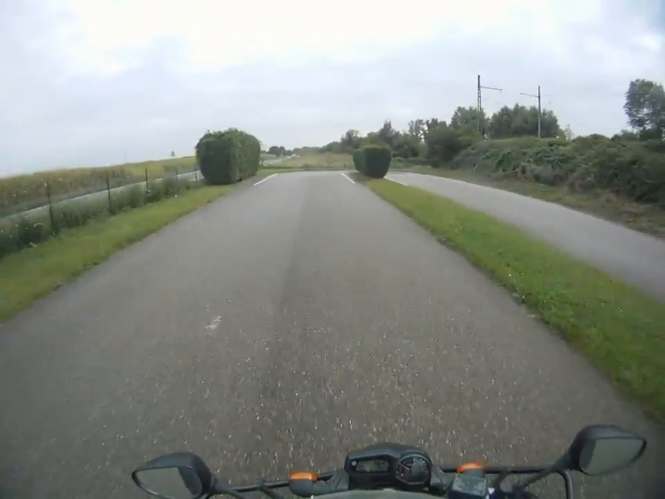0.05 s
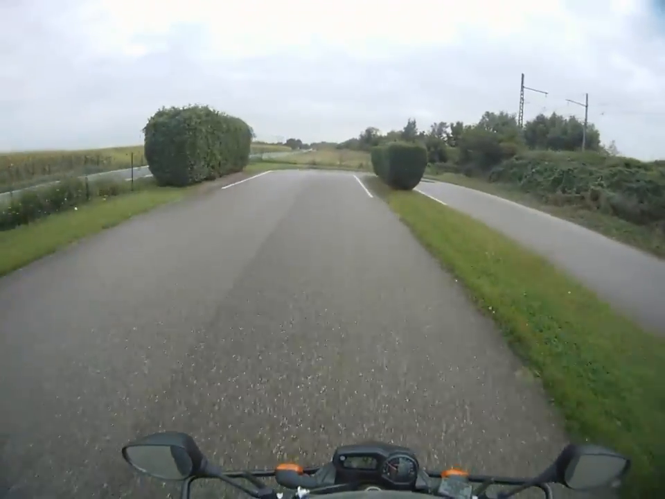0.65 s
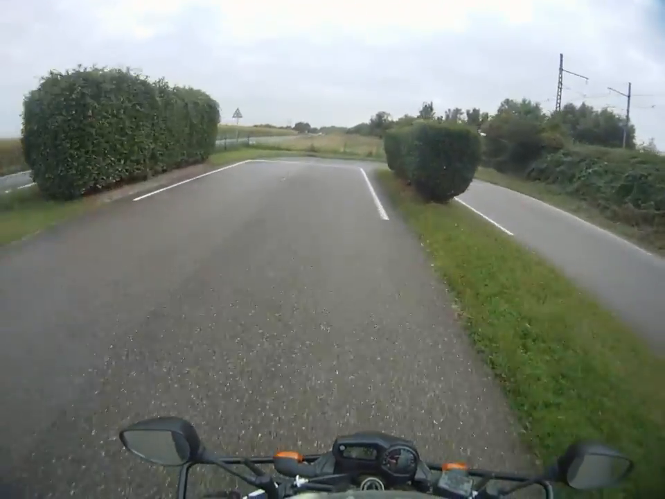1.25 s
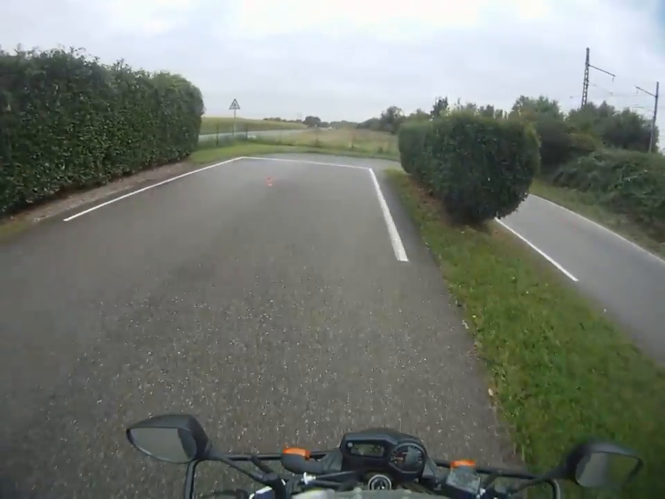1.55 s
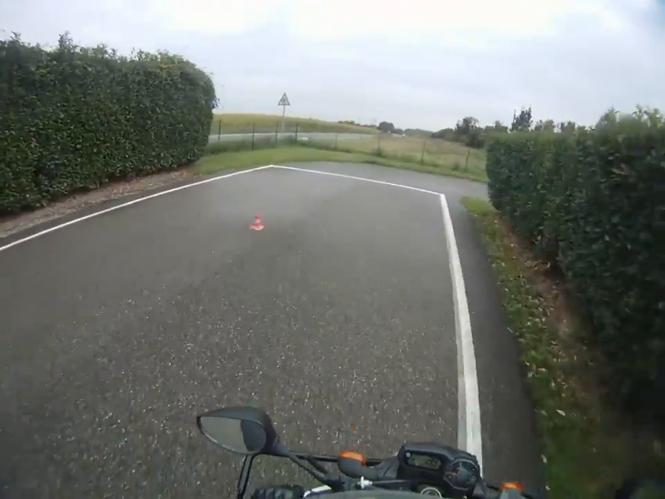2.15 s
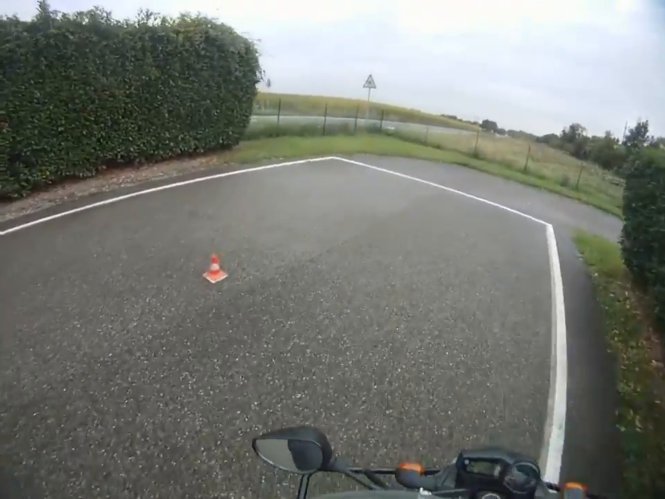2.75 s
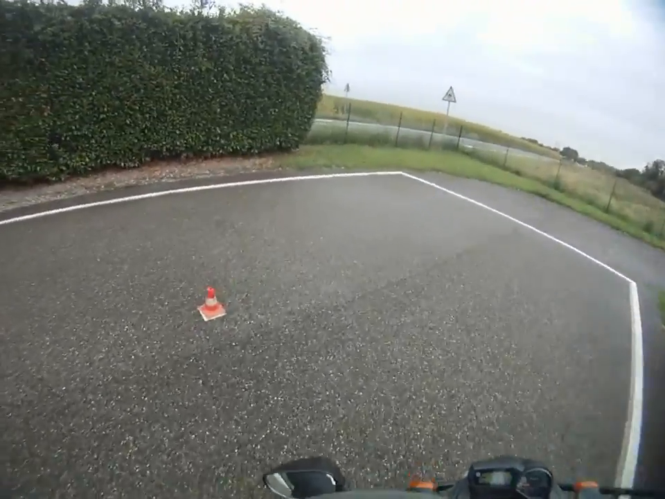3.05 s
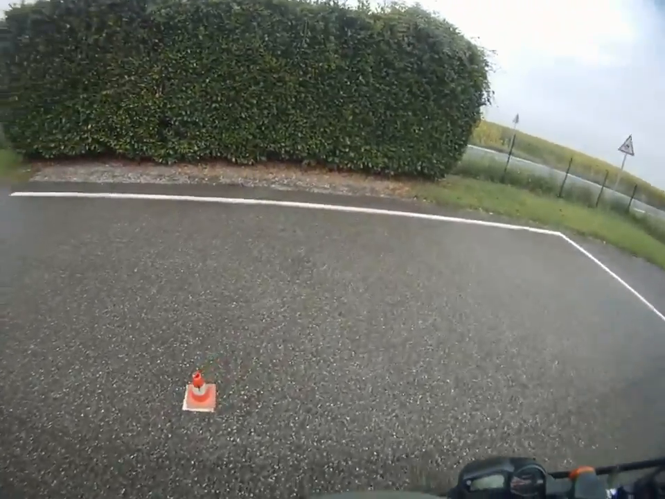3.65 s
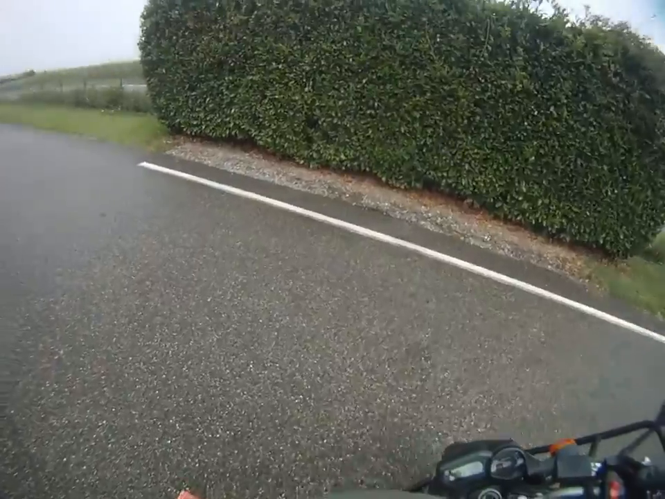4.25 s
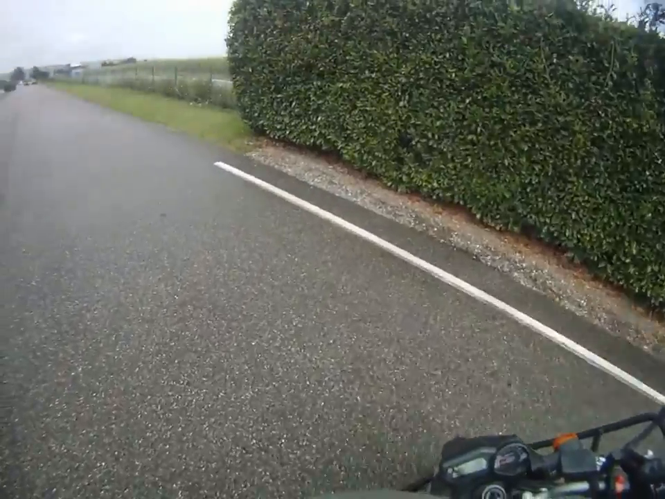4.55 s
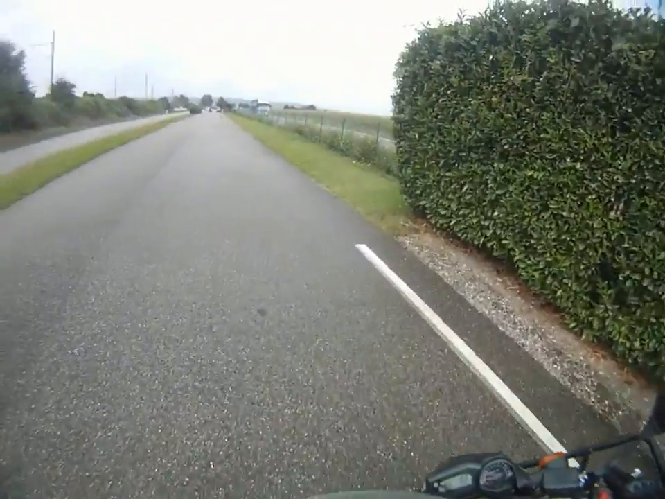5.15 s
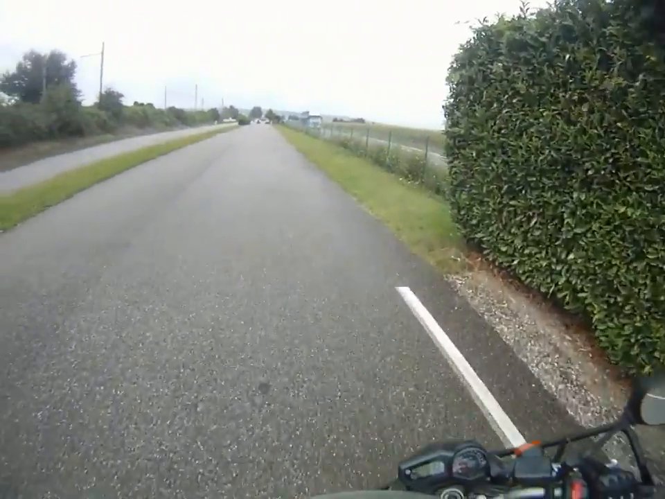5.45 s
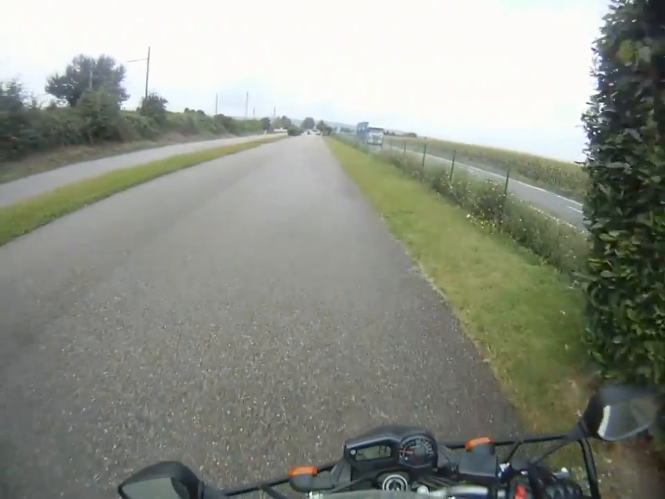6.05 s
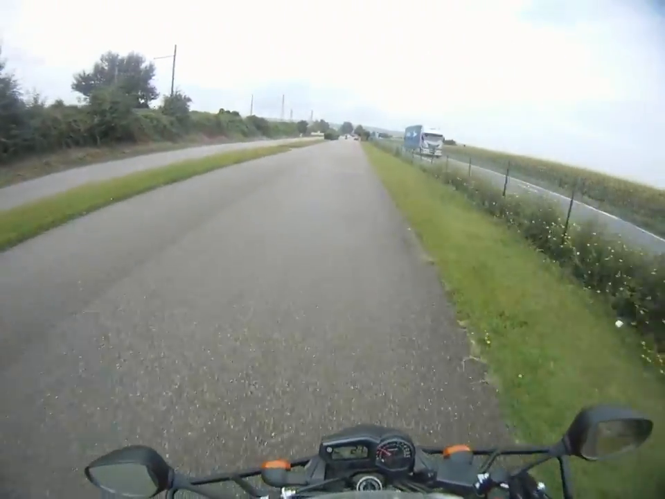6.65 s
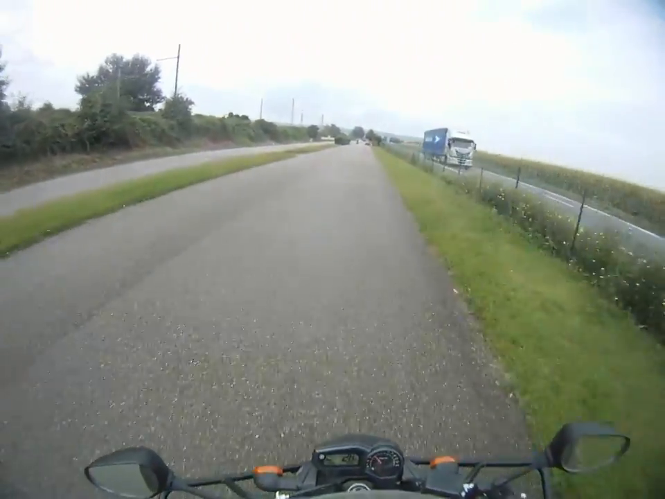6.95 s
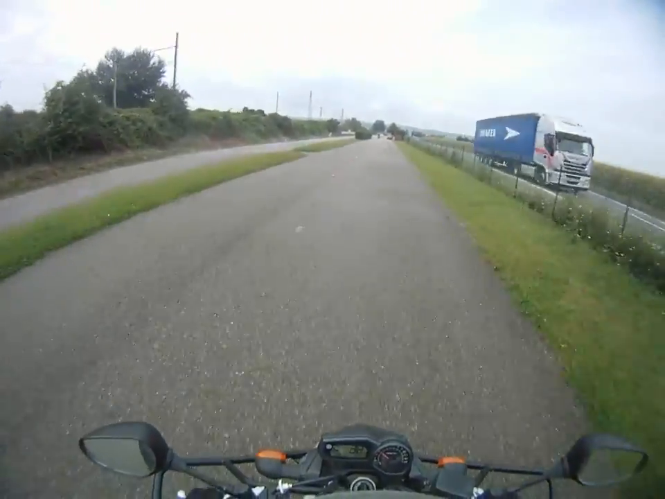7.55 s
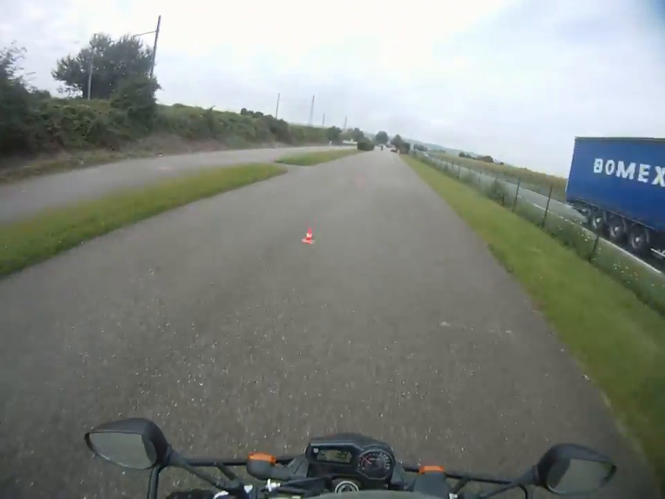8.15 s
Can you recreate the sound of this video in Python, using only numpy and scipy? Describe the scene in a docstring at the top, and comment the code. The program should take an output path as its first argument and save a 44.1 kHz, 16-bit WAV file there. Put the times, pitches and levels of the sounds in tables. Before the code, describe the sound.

A motorcycle is heard from the rider's helmet, with wind hissing and booming. The engine runs down with the throttle shut, two sharp clacks sound, and the wind calms. At low speed the helmet gives short, dull judders. After a throttle blip the engine pulls away with a rising growl and a whining chain, clacks through one upshift, and pulls again as the wind builds.

```python
"""A motorcycle, heard from the rider's helmet, rolls off, turns slowly, pulls away and shifts up once.
The exhaust hums, the intake growls and each engine order swells as it sweeps through a resonance.
Valves clatter, gears whine, chain and tyres whirr, and the chain's song climbs with the wheel.
Wind hisses over the shell and booms in its low modes; controls clack; the helmet judders in the turn."""
import sys
import numpy as np
from scipy import signal
from scipy.fft import rfft, irfft
from scipy.io import wavfile
from scipy.ndimage import uniform_filter1d

SR = 44100
rng = np.random.default_rng(int(sys.argv[2]) if len(sys.argv) > 2 else 0)


def wav_out(sig):
    """Save sig, one row per channel (or a flat mono array), as 16-bit PCM at SR to the path in sys.argv[1]."""
    wavfile.write(sys.argv[1], SR, np.round(np.clip(np.atleast_2d(sig).T, -1, 1) * 32767).astype(np.int16))


N = 366912
TIME = np.arange(N) / SR
FREQ = np.maximum(np.arange(N // 2 + 1) * SR / N, 1)

# the engine runs down, throttle shut: (time [s], four-stroke cycle rate [Hz])
REVS_DOWN = [(0, 57.5), (1.4, 32), (2.6, 19.5)]
# the engine pulls away, with one upshift: (time [s], four-stroke cycle rate [Hz])
REVS_UP = [(4.1, 19.6), (4.35, 21.9), (4.68, 20.3), (4.8, 20.64), (5.4, 24.8), (5.67, 28.15), (6, 36.23),
           (6.28, 44.73), (6.6, 54.65), (6.95, 67.47), (7.05, 62.2), (7.2, 55.7), (7.33, 48.3), (7.4, 48.2),
           (7.65, 52.76), (7.88, 57.96), (8.04, 53.5), (8.32, 52)]
# a throttle blip in the turn, then one pull in each gear:
# (opens [s], shuts [s], roll-on [s], roll-off [s], exhaust hum at its resonance [dB])
THROTTLE_PULLS = [(4.05, 4.298, .081, .17, -48), (4.403, 6.94, .63, .07, -44.5),
                  (7.205, 7.875, .025, .15, -37.3)]
# engine orders meeting resonances: (order [x cycle rate], resonance [Hz], half width [Hz], level [dB])
ORDER_SWELLS = [(4, 152, 64, -45.8), (6, 152, 38, -52), (8, 170, 15, -61), (8, 502, 50, -47),
                (9, 499, 48, -50.5), (10, 510, 46, -47.7), (11, 495, 45, -52.3), (12, 490, 70, -53),
                (13, 510, 56, -61), (14, 505, 50, -60), (16, 520, 60, -65)]
# low resonances of the intake: (frequency [Hz], width [Hz], gain [dB])
INTAKE_MODES = [(505, 130, -12.5), (780, 380, -26)]
# airbox resonances: (frequency [Hz], width [Hz], gain [dB])
AIRBOX_MODES = [(1263, 95, -6.5), (1590, 180, -24), (1900, 240, -13)]
# ring of the engine casing: (frequency [Hz], width [Hz], gain [dB])
CASING_MODES = [(610, 55, -4), (1075, 45, 8), (1160, 100, 8), (1285, 70, 4), (1820, 150, 6),
                (3110, 160, -2), (3600, 150, -5)]
# whining gears: (teeth meshing [per cycle], trim [dB])
GEAR_MESHES = [(54, -11), (58, -12), (88, -8.5)]
# frame resonances that chain and gear tones sweep through: (frequency [Hz], level [dB])
FRAME_EQ = [(400, -75), (540, -66), (615, -55), (670, -58), (748, -50.5), (830, -62), (900, -68),
            (980, -63), (1080, -50), (1170, -44), (1270, -52), (1430, -56), (1530, -51), (1640, -58),
            (1820, -49.5), (2050, -51), (2500, -59), (3100, -62), (4500, -78)]
# second gear, first with the clutch slipping in the turn, second again: (time [s], links [per cycle])
CHAIN_LINKS = [(2.2, 9.3), (3, 6.66), (4.6, 5.2), (5.05, 5.4), (5.62, 6.66), (6.95, 6.66), (7.3, 9.8)]
# tone of chain, gears and tread whirring: (frequency [Hz], gain [dB])
WHIRR_EQ = [(200, -14), (370, -10.5), (490, -5.5), (750, -10.5), (970, -9), (1080, 6.5), (1190, 2.5),
            (1450, -8), (1680, -2.5), (1900, 3), (2250, -4.5), (2600, -26), (3700, -24), (4900, -19),
            (6600, -19), (9000, -30), (15000, -29.5)]
# the bike slows for the turn and pulls away: (time [s], airspeed [m/s])
AIRSPEED = [(0, 11.32), (.7, 11.4), (1.25, 9.22), (2, 5.54), (3.1, 4.55), (3.9, 4.25), (4.9, 4.23),
            (5.4, 4.05), (6.15, 7.3), (6.9, 8.54), (7.2, 7.7), (7.7, 10.2), (8.1, 11.5), (8.32, 10.9)]
# tone of hissing air: (frequency [Hz], gain [dB])
HISS_EQ = [(150, -21), (400, -14), (690, -15), (840, -6), (1350, -3), (1650, -5.5), (2230, 3), (2700, -8),
           (3050, -6.5), (4100, -16), (5200, -19.5), (7100, -21.5), (11000, -29), (15500, -31)]
# boom of the helmet shell: (frequency [Hz], width [Hz], gain [dB])
SHELL_MODES = [(74.5, 10.7, 3), (109, 27, 0.5), (126.5, 4, -6), (221, 24, -10.5), (260.7, 32, -6.5),
               (307.3, 8.8, -11)]
# the padding passes only the lows: (frequency [Hz], gain [dB])
PADDING_EQ = [(25, -34), (55, -0.5), (68, 4.5), (150, -4.5), (190, 1.5), (315, -6), (380, -15.5), (650, -3),
              (1000, -64), (3000, -60)]
# gusts booming in the shell: (centre [s], half length [s], boost [dB])
SHELL_GUSTS = [(.12, 0.052, 1.5), (.48, 0.086, 2), (7.306, 0.06, 2.5)]
# calmer air in the turn, calmest beside the hedge: (centre [s], half length [s], buffeting change [dB])
LULLS = [(5.076, 1.74, -4.5), (5.713, 0.51, -1)]
# rumble of slow eddies: (frequency [Hz], gain [dB])
EDDY_EQ = [(10, 2), (25, 5), (45, 3), (70, -10.5), (200, -17), (800, -55)]
# puffs of air on the microphone port: (centre [s], half length [s], level [dB])
PORT_PUFFS = [(3.399, .07, -56), (3.818, 0.041, -49.5), (4.557, 0.13, -44), (7.32, 0.073, -43),
              (8.17, 0.057, -52)]
# controls and chassis clack; the last three are the gear change and the chain pulling tight:
# (time [s], level [dB], decay [s], ring pitch [Hz], ring [x rattle], tick against rattle [dB])
CLACK_HITS = [(1.22, -32.5, .009, 1250, 1.5, -15), (1.531, -32.5, .012, 1150, 1.1, -16),
              (4.195, -48.5, .016, 1280, 2.6, -15), (6.951, -41, .008, 570, 1, -5),
              (6.961, -33.5, .009, 570, 1.1, -2), (7.213, -38, .04, 1170, 1.3, -20)]
# body of a clack: (frequency [Hz], gain [dB])
RATTLE_EQ = [(200, -31), (1200, 10), (2100, 17), (3000, 10), (5000, -25), (15000, -34)]
# bright edge of a clack: (frequency [Hz], gain [dB])
TICK_EQ = [(500, 6), (3500, 1), (6000, 3), (8000, -5), (11000, -15), (15000, -32)]
# the helmet sticks and slips as the head turns:
# (start [s], length [s], slip rate [Hz], level [dB], irregularity [0-1], upper mode lift [dB])
SLIP_TRAINS = [(1.592, .092, 75.3, -41, .16, 0), (2.277, .11, 78.5, -48, .1, 0),
               (3.015, .06, 78, -44, .17, 4), (3.11, .04, 78, -46, .17, 4), (3.181, .045, 72, -39, .15, 1),
               (3.364, .02, 85, -42.5, .1, 3), (3.432, .058, 76, -32.3, .02, 3),
               (4.06, .14, 104, -40.3, .17, 5), (4.225, .025, 90, -44.5, .2, 3),
               (4.303, .042, 80, -38, .12, 1), (4.492, .012, 88, -46, .28, 3),
               (4.635, .04, 100, -48, .3, 6), (4.735, .04, 127, -46, .2, 8), (7.16, .05, 80, -39.5, .04, 0)]
# push of one slip: (frequency [Hz], gain [dB])
SLIP_EQ = [(70, 5.5), (140, 6), (240, -1), (330, 0.5), (450, -1), (900, -28)]
# intake rushes around the upshift: (centre [s], half length [s], pitch [Hz], width [Hz], level [dB])
INTAKE_RUSHES = [(6.965, .028, 580, 110, -45.5), (7.235, .04, 520, 170, -48.5)]
# treble ring of the microphone port: (frequency [Hz], width [Hz], gain [dB])
PORT_MODES = [(9000, 220, -12), (10090, 920, 16.5), (13820, 470, 18.5)]
# two steady dull gaps in the treble, near 6 and 12 kHz: (frequency [Hz], width [Hz])
TREBLE_GAPS = [(6080, 2730), (12050, 2500)]


def undb(db):
    """Decibels to gain."""
    return 10 ** (np.asarray(db) / 20)


def unit(x):
    """Scale to rms 1."""
    return x / np.sqrt(np.mean(x ** 2))


def curves(table):
    """Automation lanes, one for each column after the time."""
    times, *columns = np.transpose(table)
    return [np.interp(TIME, times, column) for column in columns]


def noise():
    """White noise."""
    return rng.standard_normal(N)


def walk(rate_hz):
    """Smooth random modulation at rms 1."""
    hold = max(int(SR / rate_hz), 1)
    steps = np.repeat(noise()[:N // hold + 1], hold)
    return unit(uniform_filter1d(uniform_filter1d(steps, hold), hold)[:N])


def swell(centre, half_length):
    """A bell-shaped fade in and out, 0-1."""
    return np.exp(-((TIME - centre) / half_length) ** 2)


def eq_db(at_hz, eq):
    """Read an EQ curve at the given frequencies."""
    hz, db = np.transpose(eq)
    return np.interp(np.log(at_hz), np.log(hz), db)


def colour(x, eq):
    """Apply an EQ curve and scale to rms 1."""
    return unit(irfft(rfft(x) * undb(eq_db(FREQ, eq)), N))


def ring(x, modes, order=1):
    """Drive a bank of resonators; order 2 steepens their skirts."""
    response = sum(undb(db) / (1 + 1j * (FREQ ** 2 - hz ** 2) / (FREQ * width)) ** order
                   for hz, width, db in modes)
    return irfft(rfft(x) * response, N)


def spin(hz, wobble, wobble_hz):
    """Phase of a turning part whose speed wavers by the share `wobble`."""
    return 2 * np.pi * np.cumsum(hz * (1 + wobble * walk(wobble_hz))) / SR


def partial(number, angle):
    """One harmonic with a random starting phase."""
    return np.sin(number * angle + rng.uniform(0, 2 * np.pi))


def pull(opens, shuts, roll_on, roll_off):
    """Throttle envelope, 0-1: roll on, hold, roll off."""
    return np.clip((TIME - opens) / roll_on, 0, 1) * np.clip(1 - (TIME - shuts) / roll_off, 0, 1)


def by_revs(cycle_hz, top_db, doubling_db):
    """Level in dB that rides the revs."""
    return top_db + doubling_db * np.log2(cycle_hz / cycle_hz.max())


def by_speed(speed, cruise_db, doubling_db, cruise_m_s=10):
    """Level in dB that rides the airspeed."""
    return cruise_db + doubling_db * np.log2(speed / cruise_m_s)


def engine(cycle_hz, throttle, shut_db=-10.5):
    """Orders and intake duck when the throttle shuts; the exhaust hums beneath them."""
    angle = spin(cycle_hz, wobble=.001, wobble_hz=30)
    voice = engine_orders(cycle_hz, angle) + intake(cycle_hz, angle)
    return exhaust_hum(cycle_hz, angle) + voice * undb(shut_db * (1 - throttle))


def engine_orders(cycle_hz, angle, waver_db=.6, roughness=.17, upshift_s=7.15, eased_db=-1.5):
    """Each order blooms as the revs carry it through a resonance; the rider eases off in second gear."""
    tones = 0
    for order, hz, half_width, db in ORDER_SWELLS:
        nearness = np.exp(-((order * cycle_hz - hz) / half_width) ** 2)
        flutter = roughness * min(hz / 500, 1)  # low resonances flutter less
        gain = undb(db + waver_db * walk(16)) * (1 + flutter * walk(60))
        tones += np.sqrt(2) * gain * nearness * partial(order, angle)
    return tones * undb(eased_db * (TIME > upshift_s))


def intake(cycle_hz, angle, roughness=.52, rasp_depth=.31):
    """Uneven gulps growl in the intake and airbox, with a rasp that pulses at the crank rate."""
    gulps = sum(.5 ** (k % 2) * partial(k, angle) for k in range(7, 80))  # odd orders are weaker
    growl = unit(ring(gulps * (1 + roughness * walk(100)), INTAKE_MODES + AIRBOX_MODES, order=2))
    rasp = colour(noise() * (1 + rasp_depth * np.sin(2 * angle)), HISS_EQ)
    return (growl * undb(by_revs(cycle_hz, top_db=-45.8, doubling_db=10))
            + rasp * undb(by_revs(cycle_hz, top_db=-49, doubling_db=5.9)))


def exhaust_hum(cycle_hz, angle, resonance_hz=108, octave_off_db=-16, shut_db=-49):
    """The exhaust hums at the crank rate, two turns a cycle, peaking in one broad resonance."""
    drive_db = shut_db + sum((db - shut_db) * pull(*timing) for *timing, db in THROTTLE_PULLS)
    octaves_off = np.log2(2 * cycle_hz / resonance_hz)
    return np.sqrt(2) * undb(drive_db + octave_off_db * octaves_off ** 2) * np.sin(2 * angle)


def valves(cycle_hz, load, ticks_per_cycle=8, decay_share=.43, scatter_db=2, unloaded_db=-3.5):
    """Valves close in quick succession; each tick rings the casing."""
    since_tick = np.cumsum(ticks_per_cycle * cycle_hz) / SR % 1
    ticks = noise() * np.exp(-since_tick / decay_share) * undb(scatter_db * walk(40))
    level_db = by_revs(cycle_hz, top_db=-45.25, doubling_db=8) + unloaded_db * (1 - load)
    return unit(ring(ticks, CASING_MODES, order=2)) * undb(level_db)


def gear_whine(cycle_hz, load, waver_db=2.5, trim_db=-9, unloaded_db=-4.5):
    """Meshing teeth sing wavering tones that follow the revs through the frame's resonances."""
    angle = spin(cycle_hz, wobble=.006, wobble_hz=18)
    tones = 0
    for teeth, db in GEAR_MESHES:
        level_db = eq_db(teeth * cycle_hz, FRAME_EQ) + db + waver_db * walk(30)
        tones += undb(level_db) * np.sin(teeth * angle)
    return np.sqrt(2) * tones * undb(trim_db + unloaded_db * (1 - load))


def chain(cycle_hz, load, full_level_hz=390, doubling_db=11, slack_db=-17):
    """Links strike the sprocket: a stack of tones tracks the wheel and lights up the frame's resonances."""
    links, = curves(CHAIN_LINKS)
    mesh_hz = cycle_hz * links
    angle = spin(mesh_hz, wobble=.003, wobble_hz=40)
    drive_db = doubling_db * np.log2(np.minimum(mesh_hz / full_level_hz, 1)) + slack_db * (1 - load)
    tones = sum(undb(eq_db(k * mesh_hz, FRAME_EQ)) * partial(k, angle) for k in range(2, 15))
    return np.sqrt(2) * tones * undb(drive_db)


def whirr(speed, load, load_db=5.5, flutter_db=1.56, sway_db=1.7):
    """Tiny impacts of chain, gears and tread blur into a whirr, louder with speed and load."""
    level_db = by_speed(speed, cruise_db=-43, doubling_db=12.96) + load_db * load + sway_db * walk(12)
    return colour(noise() * undb(flutter_db * walk(120)), WHIRR_EQ) * undb(level_db)


def wind(speed, gust_db=.65, flutter_db=.5, grain_db=1):
    """Turbulent air hisses over the helmet, fluttering as eddies break away."""
    turbulence_db = gust_db * walk(14) + flutter_db * walk(90) + grain_db * walk(900)
    hiss = colour(noise() * undb(turbulence_db), HISS_EQ)
    return hiss * undb(by_speed(speed, cruise_db=-37, doubling_db=18.4))


def whistle(speed, pitch_hz=2220, width_hz=420, flutter_db=2):
    """Fast air over an edge of the helmet rings one hollow resonance, in fits."""
    hollow = unit(ring(noise(), [(pitch_hz, width_hz, 0)], order=2))
    return hollow * undb(by_speed(speed, cruise_db=-46.5, doubling_db=32) + flutter_db * walk(35))


def shelter_db():
    """The air calms while the hedge shields the rider."""
    return sum(db * np.exp(-((TIME - centre) / half_length) ** 4) for centre, half_length, db in LULLS)


def shell(x):
    """The helmet's low modes, muffled by its padding."""
    return colour(ring(x, SHELL_MODES), PADDING_EQ)


def buffeting(speed, flutter_db=1.2, fine_db=-6, fine_growth=1.33, split_hz=190):
    """Pressure swings boom in the shell; the fine eddies above the split grow faster with speed."""
    gusts_db = sum(db * swell(*timing) for *timing, db in SHELL_GUSTS)
    level_db = by_speed(speed, cruise_db=-40, doubling_db=7.4) + shelter_db() + gusts_db
    boom = shell(noise() * undb(flutter_db * walk(25)))
    coarse = signal.sosfiltfilt(signal.butter(4, split_hz, fs=SR, output="sos"), boom)
    fine = unit(boom - coarse) * undb(fine_db + (fine_growth - 1) * (level_db - level_db.max()))
    return (coarse + fine) * undb(level_db)


def eddies(speed, gust_db=3.5):
    """The slowest eddies rumble straight on the microphone port, now and then as a puff."""
    bed_db = by_speed(speed, cruise_db=-51.5, doubling_db=1) + shelter_db() / 2 + gust_db * walk(6)
    puffs = sum(undb(db) * swell(*timing) for *timing, db in PORT_PUFFS)
    return colour(noise(), EDDY_EQ) * (undb(bed_db) + puffs)


def clacks(width_hz=90, attack_share=.25):
    """Parts knock together: a brief rattle, one ringing mode and a bright metal tick."""
    out = np.zeros(N)
    rattle, tick = colour(noise(), RATTLE_EQ), colour(noise(), TICK_EQ)
    for start, db, decay, hz, ring_gain, tick_db in CLACK_HITS:
        age = np.maximum(TIME - start, 0)
        envelope = (1 - np.exp(-age / (attack_share * decay))) * np.exp(-age / decay)
        mode = unit(ring(noise(), [(hz, width_hz, 0)]))
        out += undb(db) * envelope * (rattle + ring_gain * mode + undb(tick_db) * tick)
    return out


def judders(scatter_db=2.5):
    """Short trains of slips pump the helmet's shell modes, which then ring down."""
    out = np.zeros(N)
    for start, length, hz, db, irregularity, lift_db in SLIP_TRAINS:
        gaps, sizes = rng.standard_normal((32, 2)).T
        times = np.cumsum(np.exp(irregularity * gaps)) / hz
        times -= times[0]
        slips = np.zeros(N)
        slips[((start + times) * SR).astype(int)] = undb(scatter_db * sizes) * (times < length)
        boom = shell(colour(slips, SLIP_EQ))
        boom = colour(boom, [(150, 0), (260, lift_db)])
        loudest_rms = np.sqrt(uniform_filter1d(boom ** 2, SR // 20).max())
        out += boom * undb(db) / loudest_rms
    return out


def inrush():
    """Air rushes through the intake's low resonance as the throttle snaps shut and open for the shift."""
    return sum(unit(ring(noise(), [(hz, width, 0)], order=2)) * undb(db) * swell(*timing)
               for *timing, hz, width, db in INTAKE_RUSHES)


def scene(unload_s=.26):
    """Speed, revs and throttle ride the mono mix; the load lingers briefly after the throttle shuts."""
    speed, = curves(AIRSPEED)
    cycle_hz, = curves([*REVS_DOWN, *REVS_UP])
    throttle = sum(pull(*timing) for *timing, _ in THROTTLE_PULLS)
    load = sum(pull(opens, shuts, roll_on, unload_s) for opens, shuts, roll_on, *_ in THROTTLE_PULLS)
    load = np.minimum(load, 1)
    air = wind(speed) + whistle(speed) + buffeting(speed) + eddies(speed)
    motor = engine(cycle_hz, throttle) + valves(cycle_hz, load) + gear_whine(cycle_hz, load) + inrush()
    drive = chain(cycle_hz, load) + whirr(speed, load) + clacks()
    return (air + motor + drive + judders())[None]


def record(dry, top_hz=15300):
    """The microphone port rings. The treble has two steady dull gaps, and the top is cut steeply."""
    coloured = dry[0] + ring(dry[0], PORT_MODES)
    for hz, width in TREBLE_GAPS:
        coloured = coloured - ring(coloured, [(hz, width, 0)])
    return signal.sosfilt(signal.ellip(12, .1, 90, top_hz, fs=SR, output="sos"), coloured)[None]


dry = scene()
out = record(dry)
wav_out(out)
```